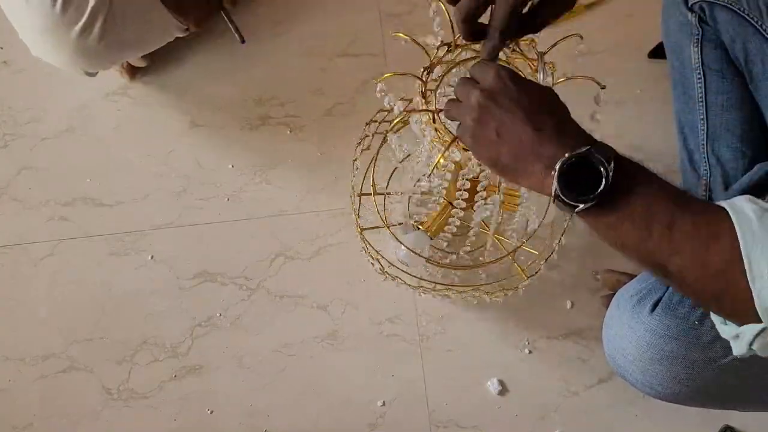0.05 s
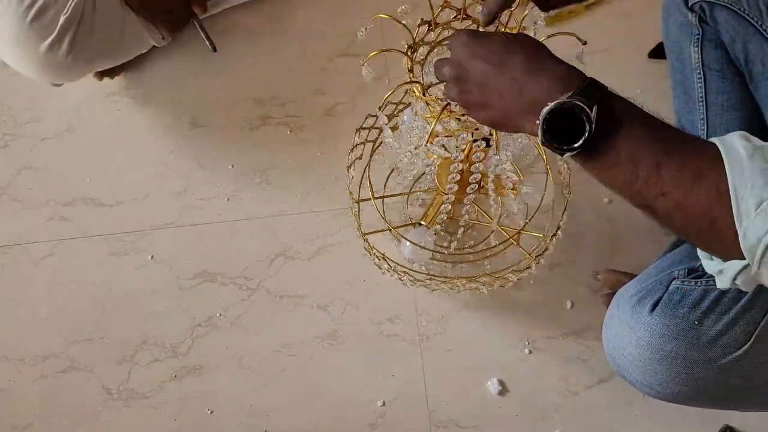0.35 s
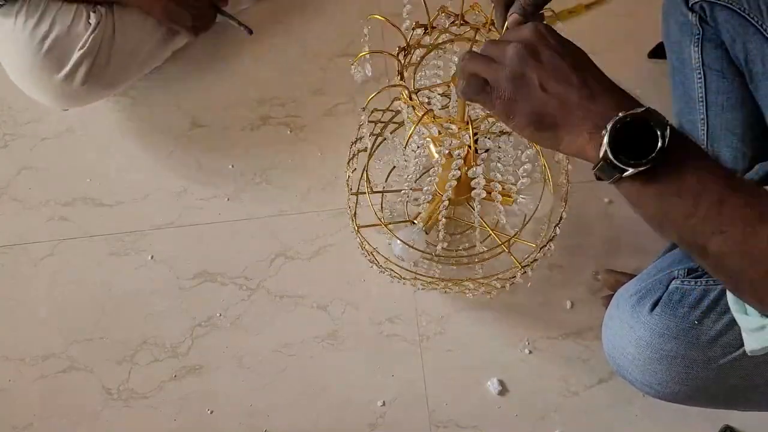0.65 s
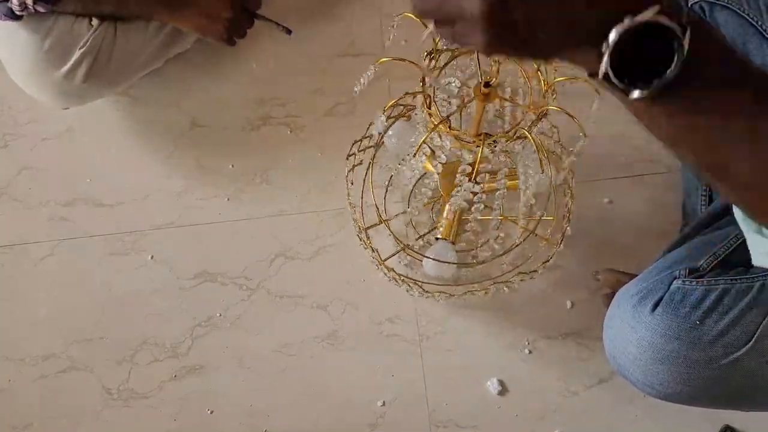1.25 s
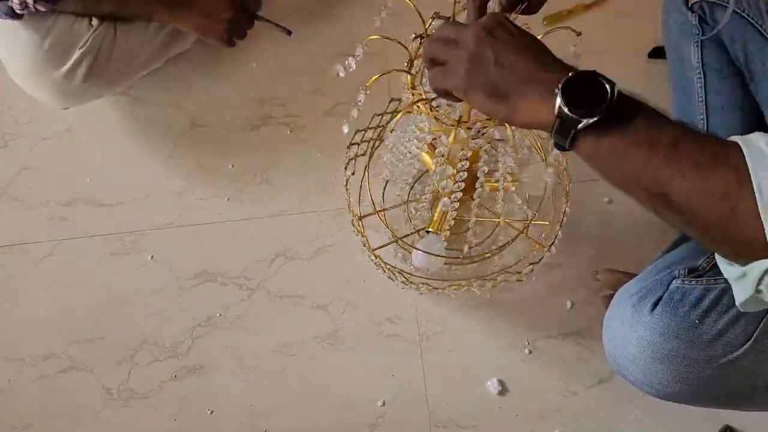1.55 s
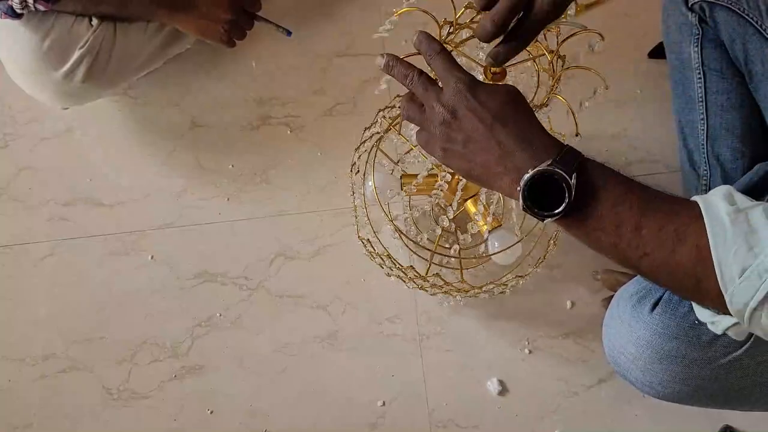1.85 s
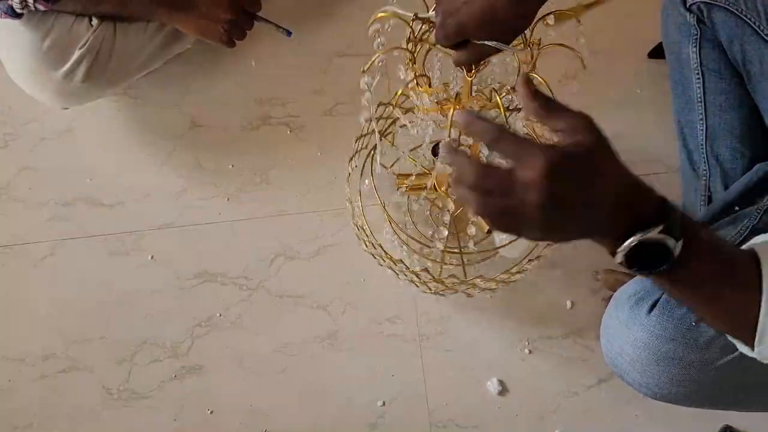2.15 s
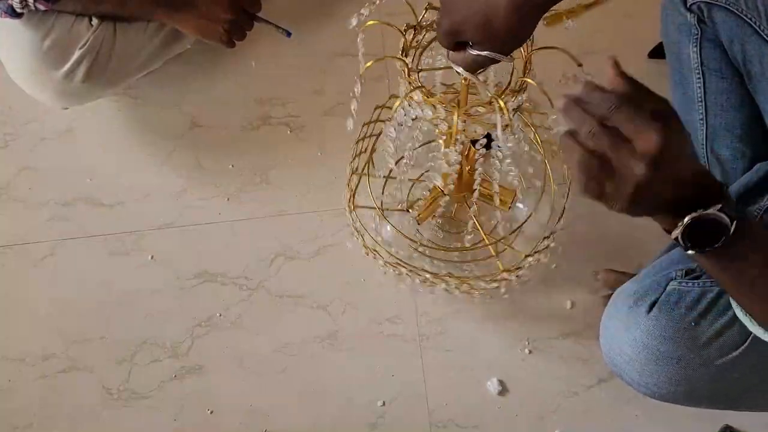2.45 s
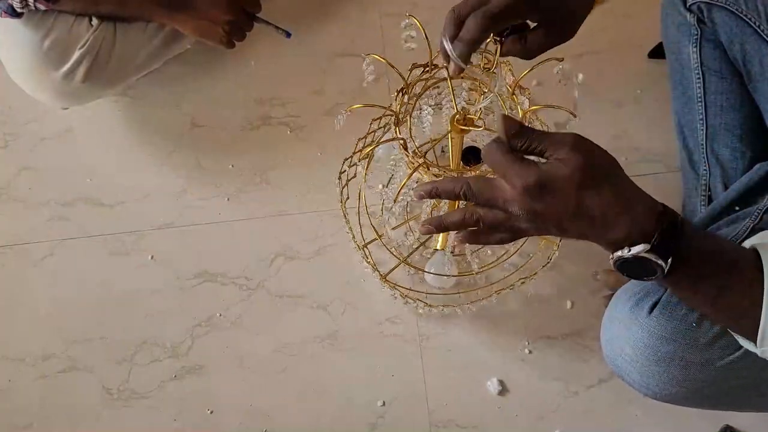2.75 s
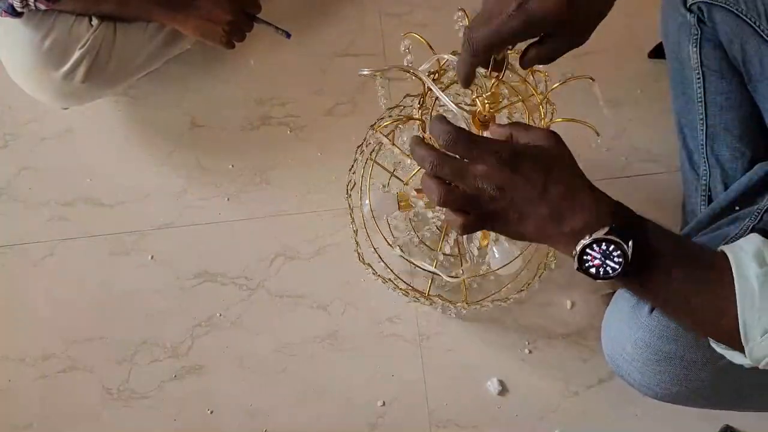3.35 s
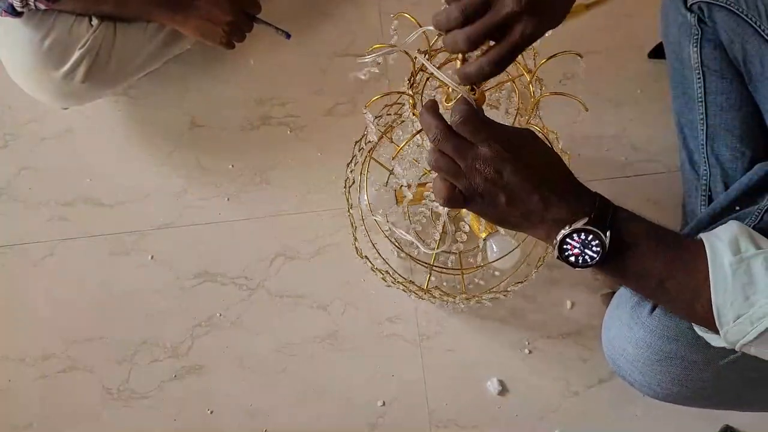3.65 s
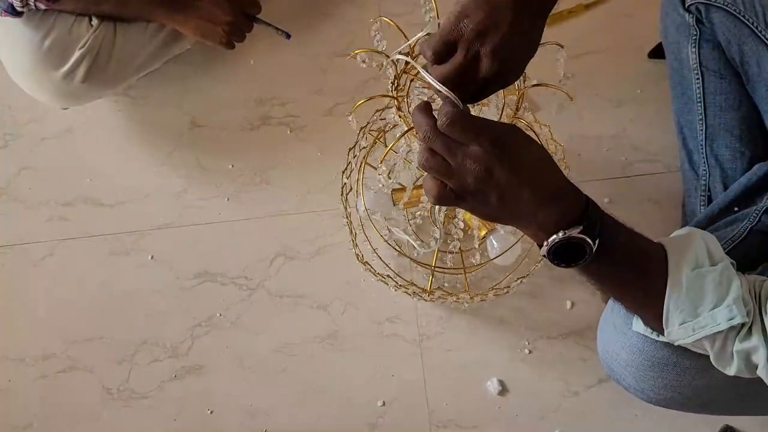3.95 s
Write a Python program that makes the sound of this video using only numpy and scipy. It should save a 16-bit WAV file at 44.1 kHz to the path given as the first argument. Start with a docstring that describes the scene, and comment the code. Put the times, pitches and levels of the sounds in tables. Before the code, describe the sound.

A small chandelier is handled in a hard room, its crystals clacking softly before a few close ticks and a cluster of ringing beads and wire. Light scrapes and jingles continue over a throbbing hum and faint pulsing chirps.

```python
"""Hands work on a small wire chandelier on a stone floor. From the start a low hum throbs, air hisses
and a faint high chirping pulses about 9 times a second. Crystals slide, chink and clack for 0.5 s;
soft rubs follow, then dry ticks at 1.4-1.8 s. At 2.1-2.7 s beads, wire and a hoop of the cage ring
in a dense cluster. Scrapes and crystal chinks go on, and a small ring jingles from 3.5 s to the end."""
import sys
import numpy as np
from scipy import signal
from scipy.fft import rfft, irfft, next_fast_len
from scipy.io import wavfile
from scipy.ndimage import map_coordinates

SR = 44100
rng = np.random.default_rng(int(sys.argv[2]) if len(sys.argv) > 2 else 0)


def transcribe(signal):
    """Save signal, clipped to [-1, 1], as a 16-bit WAV file at the path in sys.argv[1]."""
    frames = np.atleast_2d(signal).T
    limited = np.clip(frames, -1, 1)
    pcm = np.round(limited * 32767).astype(np.int16)
    wavfile.write(sys.argv[1], SR, pcm)


N = 176400

# Low hum tones and one faint high tone: f/Hz, level/dB
HUM_TONES = [(20, -21), (30, -26), (40, -37), (60, -40.5), (120, -49.5), (180, -51.5), (1544, -71)]
# Noise spectra: f/Hz, relative level/dB
RUMBLE_SPECTRUM = [(5, -1), (12, -16), (24, -4), (31, -4.5), (38, -18.5), (48, -8.5), (60, -13.5),
                   (100, -19), (135, -23), (155, -28), (210, -28.5), (300, -35), (500, -43.5), (750, -52.5),
                   (1500, -62.5), (4000, -100)]
AIR_SPECTRUM = [(200, -17), (700, -3), (1300, -1.5), (1650, 4.5), (2200, -2.5), (3200, -4), (4800, -6),
                (6200, -6.5), (7200, -1.5), (7900, -1.5), (9000, -8), (10500, -9), (12500, -11),
                (15800, -8.5)]
CHIRP_HISS_SPECTRUM = [(6000, -33), (6650, 6), (7050, 4), (7400, -4), (8300, -5), (9200, -18)]
RUB_BODY_SPECTRUM = [(600, -32), (1500, -4), (3500, -6.5), (4600, -5.5), (5500, 0), (6500, -3.5),
                     (8000, -8), (10000, -48), (16000, -30.5)]
RUB_SIZZLE_SPECTRUM = [(3000, -17), (7000, -13), (9500, -9), (11500, -3), (13500, -3), (15600, -7)]
# Stereo widths: f/Hz, side over mid/dB
RUMBLE_WIDTH = [(60, -90), (110, -70), (160, -56), (260, -49), (400, -38), (700, -32.5)]
AIR_WIDTH = [(100, -40), (300, -17), (700, -17), (1500, -21), (3000, -17), (5500, -0.5), (7200, -21),
             (8700, -24), (12000, -3)]
RUB_WIDTH = [(1000, -13), (4000, -1), (8000, -0.5), (12000, 0.5)]
# Pace of the chirping: t/s, pulses so far
CHIRP_PULSES = [(.008, 0), (.565, 5), (2.205, 20), (2.785, 25), (4.02, 36)]
# Whistle pitch: t/s, f/Hz
WHISTLE_PITCH = [(0, 9200), (.7, 8800), (.82, 9440), (.98, 8830), (2.05, 9150), (2.7, 8930), (3.199, 8770),
                 (3.42, 9600), (3.55, 8630)]
# Room decay: f/Hz, t60/s
ROOM_DECAY = [(300, 0.15), (4000, 0.46), (14000, 0.1)]
# Microphone balance: f/Hz, left minus right/dB
MIC_TILT = [(2000, 0), (5200, 0.5), (6200, -1.5), (7600, -0.2), (10000, 0.7), (13000, 1.3), (15000, 5)]
# Handling scuffs: t/s, level/dB, centre f/Hz, sigma/s
SCUFF_EVENTS = [(0.332, -52, 714, 0.018), (0.635, -47, 457, 0.019), (1.021, -52.5, 1520, 0.009),
                (1.467, -60, 990, 0.0065), (1.811, -48.5, 1400, 0.0023), (2.403, -53.5, 1130, 0.014),
                (2.577, -59, 990, 0.041), (2.906, -48.5, 865, 0.019), (3.303, -54.5, 314, 0.028)]
# Dry ticks: t/s, level/dB, low-mode gain/dB
TICK_EVENTS = [(1.454, -34.5, 0), (1.499, -44, -10), (1.5426, -42, -1), (1.5997, -26.5, 0.5),
               (1.794, -41, 3), (1.8097, -36, 5.5), (2.143, -50, 1)]
# Parts rubbing: t/s, body level/dB, sizzle level/dB, rise/s, fall/s
SCRAPE_STROKES = [(0.016, -44, -42.5, 0.06, 0.01), (.075, -52.5, -50, 0.0084, 0.026),
                  (.13, -51.5, -51, 0.014, 0.035), (.24, -49.5, -46.5, 0.048, 0.079),
                  (.324, -49, -41, .003, 0.0084), (0.3636, -44, -42.5, .001, 0.02),
                  (.4235, -49, -45, .001, 0.0079), (.638, -54, -56, 0.02, 0.037),
                  (.945, -55.5, -58, 0.043, 0.069), (1.17, -55, -54, .015, 0.044),
                  (1.322, -48, -44, 0.014, 0.011), (1.375, -57, -55, .003, 0.026),
                  (1.711, -47.5, -44.5, 0.03, 0.057), (1.832, -49.5, -43, .0005, 0.03),
                  (2.127, -48, -45, .002, 0.028), (2.161, -49, -44.5, 0.018, 0.055),
                  (2.29, -51.5, -49, 0.014, 0.094), (2.3725, -54, -42, .0007, 0.0063),
                  (2.618, -57, -37, .0006, 0.0055), (2.42, -51.5, -46.5, 0.038, 0.062),
                  (2.491, -45.5, -41, 0.0057, 0.024), (2.536, -42.5, -40, 0.0033, 0.012),
                  (2.566, -50.5, -46, 0.005, 0.044), (2.643, -50, -47, 0.0089, 0.051),
                  (2.881, -55.5, -55, 0.018, 0.059), (2.955, -57, -50, 0.0089, 0.023),
                  (3.032, -47, -43, 0.0025, 0.012), (3.065, -50, -48, 0.0044, 0.016),
                  (3.109, -51, -47, 0.0018, 0.0088), (3.142, -46.5, -47, .007, 0.013),
                  (3.752, -51.5, -48.5, .012, 0.031), (3.844, -45, -39, 0.007, 0.013),
                  (3.875, -45, -35.5, .0006, 0.0095), (3.91, -47.5, -44, 0.014, .025),
                  (3.99, -53, -50, .02, 0.023)]
# Contacts per part: t/s, level/dB, slide-in/s
BEAD_CONTACTS = [(.017, -54, .003), (.2, -52, .01), (.325, -39, 0.0033), (.53, -54, .002),
                 (1.8335, -35.5, .0004), (1.995, -53, .003), (2.082, -48, 0.0048), (2.108, -47, .004),
                 (2.325, -46, 0.013), (2.155, -40, .01), (2.185, -37.5, 0.011), (2.222, -36, 0.0044),
                 (2.268, -43, .002), (2.289, -33.5, .003), (2.373, -34.5, .002), (2.42, -46, .01),
                 (2.494, -30.5, 0.0064), (2.537, -31, 0.0021), (2.565, -47, .002), (2.618, -37, .0005)]
WIRE_CONTACTS = [(.93, -56, 0.007), (2.152, -37.5, 0.0031), (2.181, -53, 0.0036), (2.266, -38.5, 0.0013),
                 (2.298, -46, .004), (2.322, -40, 0.0048), (2.416, -39.5, 0.0058), (2.512, -46, 0.0042),
                 (2.54, -44, .003), (2.568, -42, 0.004)]
HOOP_CONTACTS = [(1.38, -64, .03), (1.85, -61, .006), (2.21, -57, .02), (2.32, -55, .02),
                 (2.42, -54, 0.0092), (2.51, -53.5, 0.027), (2.565, -53, 0.011)]
CLACK_CONTACTS = [(.324, -54, .001), (.3655, -38, .001), (.378, -49, .001), (.4245, -46, .0008),
                  (.53, -51, .001)]  # crystal on crystal
CRYSTAL_CONTACTS = [(.11, -49, .005), (.2, -46, .005), (1.388, -55, .004), (2.771, -48, 0.0023),
                    (3.143, -38, 0.0055)]
RING_CONTACTS = [(3.463, -49, .004), (3.52, -52, .002), (3.59, -51, 0.009), (3.75, -48.5, .006),
                 (3.845, -43, 0.0079), (3.877, -44, 0.0018), (3.912, -44, .005), (3.99, -51, 0.0065)]
# Modes: f/Hz, relative level/dB, t60/s
TICK_HIGH_MODES = [(9050, 1, 0.0038), (10100, -3, 0.0044)]
TICK_LOW_MODES = [(2080, -11.5, 0.012), (3000, 2, 0.003), (4770, -0.5, 0.003)]
BEAD_MODES = [(11400, -15, .06), (11591, -4, .11), (11686, -11, .09), (11830, -15, .06), (12380, -16, .07),
              (12800, -16.5, .06), (13190, -11, .07), (13635, -11, .07), (15700, -17, .05)]
WIRE_MODES = [(5070, -5, .09), (5124, -1.5, .12), (5360, -13, .12), (5755, -10, .12), (6000, -13, .1),
              (6912, -16, .13)]
HOOP_MODES = [(2943, -0.5, 0.19), (5757, -5.5, .16)]
CLACK_MODES = [(3470, -6.5, 0.047), (5250, -1, 0.043), (5740, -14, .035), (6040, -6, 0.032),
               (6680, -4, 0.027)]
CRYSTAL_MODES = [(5362, -7, .11), (8963, -6, .09), (9523, -7, .1), (12310, -.5, .08), (13180, -6, .09)]
RING_MODES = [(6350, -14, 0.06), (11440, -4, .12), (14282, -9, .2), (14788, -9, .15), (15080, -3, .18)]


def amp(db):
    """Decibels to gain."""
    return 10 ** (np.asarray(db) / 20)


def unit(x):
    """Scale to rms 1."""
    return x / np.sqrt(np.mean(x ** 2) + 1e-20)


def along(points, hz):
    """Interpolate (f/Hz, value) points on a log axis."""
    knots_hz, values = np.transpose(points)
    return np.interp(np.log(hz + 1), np.log(knots_hz + 1), values)


def wobble(rate_hz, size=N):
    """Smooth random curve, rate_hz knots a second."""
    return map_coordinates(rng.standard_normal(size // 8), [np.arange(size) * rate_hz / SR], mode="wrap")


def filtered(x, response):
    """Apply the gain response(hz)."""
    size = next_fast_len(N + SR // 2)
    return irfft(rfft(x, size) * response(np.fft.rfftfreq(size, 1 / SR)), size)[..., :N]


def noise(spectrum, width):
    """Coloured stereo noise, rms 1."""
    def response(hz):
        mid_db = along(spectrum, hz)
        return amp([mid_db, mid_db + along(width, hz)])
    mid, side = filtered(rng.standard_normal((2, N)), response)
    return unit(np.array([mid + side, mid - side]))


def add(track, at_s, sound):
    """Mix a sound in, cut to the track."""
    start = round(at_s * SR)
    lo, hi = max(start, 0), min(start + sound.shape[-1], N)
    if hi > lo:
        track[..., lo:hi] += sound[..., lo - start:hi - start]


def swell(t, rise_s, fall_s):
    """Exponential rise to t = 0, then exponential fall."""
    return np.exp(np.minimum(t / rise_s, -t / fall_s))


def hum(drift_rad=.15, waver_db=1.5, rumble_db=-23, air_db=-56):
    """Low throbbing hum and rumble, with a faint steady high tone and air hiss."""
    tones, t = np.zeros(N), np.arange(N) / SR
    for hz, db in HUM_TONES:
        peak = np.sqrt(2) * amp(db + waver_db * wobble(3.15))
        tones += peak * np.sin(2 * np.pi * (hz * t + rng.random()) + drift_rad * wobble(2.34))
    rumble = amp(rumble_db) * noise(RUMBLE_SPECTRUM, RUMBLE_WIDTH)
    air = amp(air_db) * noise(AIR_SPECTRUM, AIR_WIDTH)
    return tones + rumble + air


def lull(at_s):
    """0 on each pulse of the chirping, 1 midway between."""
    return np.sin(np.pi * np.interp(at_s, *np.transpose(CHIRP_PULSES))) ** 2


def chirps(centre_hz=7013, fall_hz_per_s=37000, gap_s=.016, sigma_s=.0044,
           level_db=-51.5, dip_db=13, hiss_db=-65.5):
    """Quick, uneven falling chirps swell in pulses over a narrow hiss; mono."""
    out, t = np.zeros(N), np.arange(-SR // 50, SR // 50) / SR
    for k, (late, detune, scatter_db) in enumerate(rng.standard_normal((int(N / SR / gap_s), 3))):
        at_s = (k + .3 * late) * gap_s
        cycles = centre_hz * (1 + .013 * detune) * t - fall_hz_per_s * t ** 2 / 2
        phase = 2 * np.pi * cycles + .75 * wobble(713, len(t))
        envelope = amp(level_db - dip_db * lull(at_s) + scatter_db) * np.exp(-.5 * (t / sigma_s) ** 2)
        add(out, at_s + t[0], envelope * np.sin(phase))
    hiss = unit(filtered(rng.standard_normal(N), lambda hz: amp(along(CHIRP_HISS_SPECTRUM, hz))))
    return out + amp(hiss_db) * hiss


def whistle(level_db=-61, dip_db=9, swing_db=2, waver_hz=100, rough_rad=1.2):
    """Thin, wavering tone above the chirps, pulsing with them; mono."""
    t = np.arange(N) / SR
    pitch_hz = np.interp(t, *np.transpose(WHISTLE_PITCH)) + waver_hz * wobble(10)
    envelope = amp(level_db - dip_db * lull(t) + swing_db * wobble(7.43))
    return envelope * np.sin(2 * np.pi * np.cumsum(pitch_hz) / SR + rough_rad * wobble(800))


def room(x, level_db=-6.5):
    """Hard room's tail: decaying noise, separate per microphone."""
    hz, t, spectra = signal.stft(rng.standard_normal((2, SR // 2)), SR, nperseg=256)
    decay = amp(-60 * t / along(ROOM_DECAY, hz)[:, None])
    tail = signal.istft(spectra * decay, SR, nperseg=256)[1]
    tail /= np.linalg.norm(tail[0])
    return amp(level_db) * signal.fftconvolve(x, tail, axes=1)[:, :N]


def scuffs(log_width=.35):
    """Hands rub softly: dull swells of band noise."""
    out, t = np.zeros(N), np.arange(N) / SR
    for at_s, db, centre_hz, sigma_s in SCUFF_EVENTS:
        white = rng.standard_normal(N)
        band = filtered(white, lambda hz: np.exp(-.5 * (np.log((hz + 1) / centre_hz) / log_width) ** 2))
        out += amp(db) * np.exp(-.5 * ((t - at_s) / sigma_s) ** 2) * unit(band)
    return out


def ticks(attack_s=.00028, detune=.037):
    """Tiny dry snaps near the microphone: fast-damped modes."""
    out, t = np.zeros(N), np.arange(SR // 50) / SR
    attack = 1 - np.exp(-t / attack_s)

    def ring(modes):
        return sum(amp(db - 60 * t / t60_s) * np.sin(2 * np.pi * hz * rng.normal(1, detune) * t)
                   for hz, db, t60_s in modes)
    for at_s, db, low_db in TICK_EVENTS:
        snap = ring(TICK_HIGH_MODES) + amp(low_db) * ring(TICK_LOW_MODES)
        add(out, at_s, amp(db) * attack * snap)
    return out


def scrapes(grain_db=3.5, catch_rate_hz=820):
    """Glass and wire rub and catch in short grainy strokes."""
    power, t = np.zeros((2, N)), np.arange(N) / SR
    for at_s, body_db, sizzle_db, rise_s, fall_s in SCRAPE_STROKES:
        power += (amp([[body_db], [sizzle_db]]) * swell(t - at_s, rise_s, fall_s)) ** 2
    grain = unit(amp(grain_db * wobble(catch_rate_hz) + 1.4 * wobble(90)))
    body, sizzle = np.sqrt(power) * grain
    return body * noise(RUB_BODY_SPECTRUM, RUB_WIDTH) + sizzle * noise(RUB_SIZZLE_SPECTRUM, RUB_WIDTH)


def chinks(contacts, modes, rough, chatter_hz=250, spread_rad=.96, scatter_db=2, detune=.003):
    """A part slides into contact and rings; chatter shakes each mode's phase and level."""
    out, t = np.zeros((2, N)), np.arange(-SR // 20, SR // 4) / SR
    for at_s, contact_db, rise_s in contacts:
        for hz, mode_db, t60_s in modes:
            mic_phase = rng.uniform(0, 2 * np.pi) + spread_rad * rng.standard_normal((2, 1))
            phase = mic_phase + rough * wobble(chatter_hz, len(t))
            flutter = np.exp(rough / 2 * wobble(chatter_hz, len(t)) - (rough / 2) ** 2)
            gain = amp(contact_db + mode_db + scatter_db * rng.standard_normal())
            envelope = gain * swell(t, rise_s, t60_s / np.log(1000)) * flutter
            tone = np.sin(2 * np.pi * hz * rng.normal(1, detune) * t + phase)
            add(out, at_s + t[0], envelope * tone)
    return out


def scene():
    """Chandelier in its room, plus dry ticks and background."""
    ringing = (chinks(BEAD_CONTACTS, BEAD_MODES, rough=.72, chatter_hz=280)
               + chinks(WIRE_CONTACTS, WIRE_MODES, rough=.8)
               + chinks(HOOP_CONTACTS, HOOP_MODES, rough=.65)
               + chinks(CLACK_CONTACTS, CLACK_MODES, rough=.93, chatter_hz=1100)
               + chinks(CRYSTAL_CONTACTS, CRYSTAL_MODES, rough=.7)
               + chinks(RING_CONTACTS, RING_MODES, rough=.97, chatter_hz=330))
    chandelier = ringing + scrapes() + scuffs()
    return chandelier + room(chandelier) + ticks() + chirps() + whistle() + hum()


def record(dry):
    """Soft ends, brighter left microphone, hard band limit."""
    fade_s, top_hz = .005, 15850
    t = np.arange(N) / SR
    edge_s = np.minimum(t, t[-1] - t)
    fade = np.sin(np.pi / 2 * np.clip(edge_s / fade_s, 0, 1)) ** 2
    return filtered(dry * fade, lambda hz: amp(np.outer([.5, -.5], along(MIC_TILT, hz))) * (hz < top_hz))


dry = scene()
out = record(dry)
transcribe(out)
```